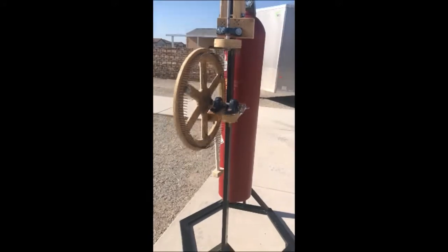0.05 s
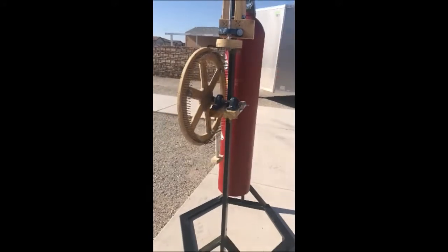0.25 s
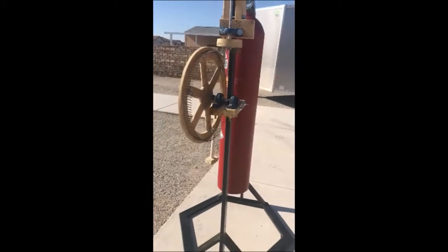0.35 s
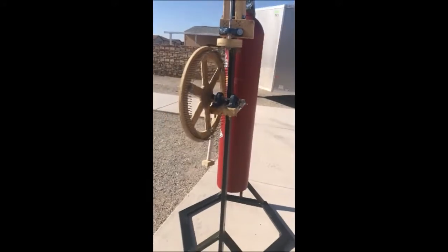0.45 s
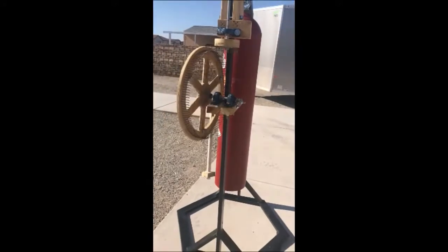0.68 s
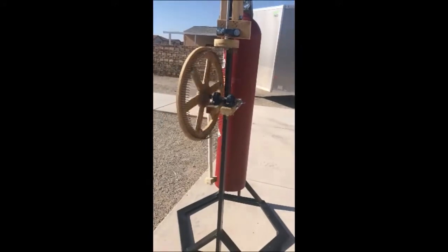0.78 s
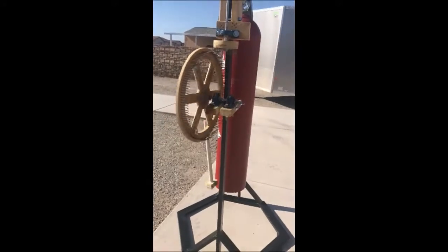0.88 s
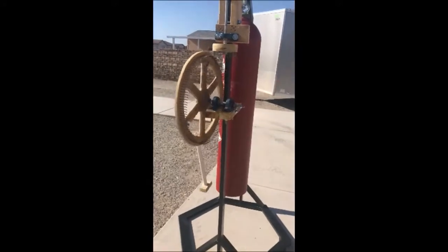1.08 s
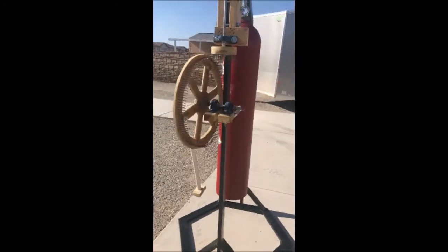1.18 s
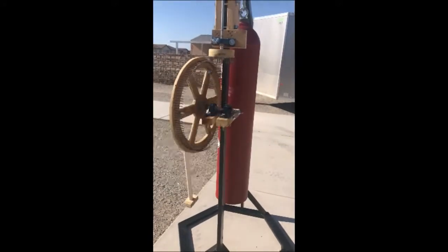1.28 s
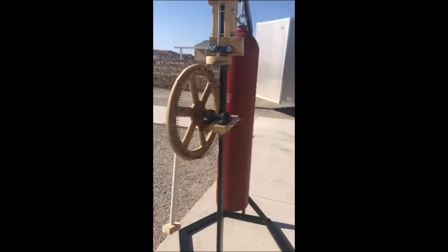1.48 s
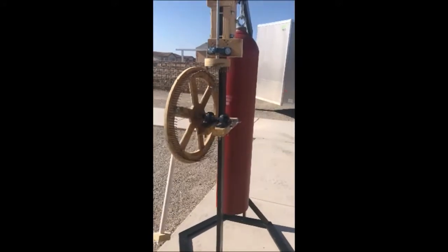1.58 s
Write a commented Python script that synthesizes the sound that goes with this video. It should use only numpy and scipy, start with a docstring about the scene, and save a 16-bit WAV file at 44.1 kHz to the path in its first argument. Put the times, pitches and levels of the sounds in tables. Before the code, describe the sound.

A hanging steel gas cylinder, already humming faintly, is struck once by a mallet with a sharp, rattling clang. It rings on in wavering, bell-like tones while a wooden wheel ticks very faintly, outdoors over a low distant rumble.

```python
"""A mallet strikes a gas cylinder

Outdoors, the mallet of a wooden wheel mechanism hits a hanging steel gas cylinder once and chatters
against its wall. The steel rings in pairs of close tones that beat (swell and dip), over two low hums
left by an earlier blow. The yard echoes; the wheel rubs and ticks; faint air and rumble lie behind."""
import sys
import numpy as np
from scipy import signal
from scipy.fft import rfft, irfft, next_fast_len
from scipy.io import wavfile
from scipy.ndimage import map_coordinates

SR = 44100
rng = np.random.default_rng(int(sys.argv[2]) if len(sys.argv) > 2 else 0)


def generate_wav(signal):
    """Clip the signal to [-1, 1] and save it as 16-bit WAV at the path in sys.argv[1]."""
    frames = np.transpose(np.atleast_2d(signal))
    scaled = np.clip(frames, -1, 1) * 32767
    pcm = np.round(scaled).astype(np.int16)
    wavfile.write(sys.argv[1], SR, pcm)


N = 72765
STRIKE_S = .203

# The cylinder's tone pairs; a ring time is how long a sound takes to fall by 60 dB:
# (pitch [Hz], level [dB], ring time [s], twin's offset [Hz], twin's strength [0-1], time of a dip [s])
TONE_PAIRS = [ (741.4, -25.5, 3.6, -1.25, .6, .58), (855.5, -30.5, 8.3, 1.96, .15, .62),
              (918.9, -22.6, 5, 1.95, .42, .72), (1225.7, -33.3, 1.9, 3.45, .55, .47),
              (1275.5, -37, 3.2, -1.1, .45, .4), (1517.2, -35.4, 1.9, 4, .3, .22),
              (1595, -35.7, 1.7, -6.2, .35, .3), (1624.9, -32.8, 1.5, -8.3, .65, .32),
              (1666.6, -31.1, 1.56, 7.5, .8, .2), (1747.2, -34.6, 1.34, 6.8, .8, .21),
              (1872, -42.5, 1.24, 8.8, .65, .27), (2060.6, -38.9, 1.32, 4.4, .25, .25),
              (2321.9, -50.2, 1.73, 6.4, .35, .31), (2492, -51.5, 3, 5.5, .35, 0.78),
              (2635, -45.5, 0.92, 0.5, 0.6, 1), (2737, -45, 1.4, 1.4, 0, .3),
              (2756.2, -41, .95, 5.5, .25, .37), (2850, -48, 1.3, 5.5, 0.7, 0.4)]
# Its weak upper tones: (pitch [Hz], level [dB], ring time [s])
OVERTONES = [(1050, -53, 3), (1212, -47, 3.5), (2960, -52.5, 0.64), (3122, -53.5, 1.2), (3300, -59, 1.5),
             (3610, -59.5, 1.1), (3620, -64.5, 2.4), (3903, -62.5, 1.1), (4000, -28.5, 0.11),
             (4120, -61.5, 0.87), (4600, -62.5, 0.93), (5310, -68.5, 1.9)]
# Its shimmer of high tones: (pitch [Hz], greatest level of a tone [dB])
SHIMMER_LEVELS = [(2900, -61), (4000, -62), (6500, -64.5), (9000, -76), (14000, -77.5)]
# Its low hums: (pitch [Hz], level [dB], twin's offset [Hz], twin's strength [0-1], time of a dip [s])
HUM_PAIRS = [(319.44, -40, -1.044, 0.72, 0.76), (407.2, -44, .55, 0.2, 1.65)]
# The mallet's hard contacts: (time [s], peak level [dB])
CONTACTS = [(.2029, -26), (.206, -7.5), (.2092, -3.5), (.2168, -13), (.22, -8), (.2333, -20), (.2428, -20)]
# Tone colour of the wooden rattle: (frequency [Hz], relative level [dB])
RATTLE_COLOUR = [(60, -50.5), (200, -23), (500, -11), (800, -6.5), (1000, -7), (1190, 9), (1420, -6),
                 (1750, 1), (2400, -15), (3500, -5), (4200, -4), (6300, -9.5), (8000, -15.5), (10500, -19),
                 (13000, -16.5), (16000, -29.5)]
# How long the rattle lasts: (frequency [Hz], ring time [s])
RATTLE_RING_TIMES = [(300, .16), (1200, 0.11), (2500, .13), (5000, .11), (13000, 0.11)]
# Tone colour of the yard's echoes: (frequency [Hz], relative level [dB])
ECHO_COLOUR = [(80, -50), (300, -24.5), (550, -17.5), (750, 4), (1200, -6.5), (1700, -5), (2200, -16),
               (2800, -14.5), (4000, -27), (8000, -39), (14000, -50)]
# Rubs of the wheel: (start [s], decay time [s], level [dB])
RUBS = [(.95, .05, -65.5), (1.1, .05, -64.5), (1.275, .09, -69)]
# Tone colour of a rub: (frequency [Hz], relative level [dB])
RUB_COLOUR = [(500, -13), (1500, -3), (3800, 1.5), (7000, -9.5), (15000, -17.5)]
# Ticks of the wheel's teeth: (time [s], level [dB])
TICKS = [(0.067, -53), (.565, -52.5), (.61, -52.5), (0.747, -51), (.94, -54), (0.96, -52.5), (0.977, -58),
         (.998, -51), (1.113, -50.5), (1.157, -53), (1.295, -57), (1.34, -51.5), (1.371, -54.5),
         (1.522, -51.5)]
# The tones in one tick: (pitch [Hz], relative level [dB], ring time [s])
TICK_TONES = [(3707, -8, .005), (5940, -5, 0.0033), (11800, -15, .004)]
# Tone colour of the distant rumble: (frequency [Hz], relative level [dB])
RUMBLE_COLOUR = [(20, -27), (45, -2.5), (80, -1.5), (130, -5.5), (175, -0.5), (240, -10.5), (350, -9.5),
                 (480, -21), (650, -13), (1000, -16.5), (1200, -21.5), (1500, -28), (2200, -35.5),
                 (4000, -60)]
# Puffs of breeze on the microphone: (time [s], half-width [s], level [dB])
PUFFS = [(1.17, 0.031, -53), (1.335, 0.021, -45.5), (1.61, 0.027, -43.5)]
# Tone colour of a puff: (frequency [Hz], relative level [dB])
PUFF_COLOUR = [(20, -25), (40, -4), (58, 0.5), (80, -9.5), (160, -29.5), (500, -52.5), (2000, -90.5)]
# Tone colour of the air's hiss: (frequency [Hz], relative level [dB])
AIR_COLOUR = [(1180, -33.5), (2000, -6.5), (2760, -5), (3170, -4), (4990, -10.5), (5630, -11.5),
              (16000, -20)]


def cylinder(rise_s=.00069, pair_waver_db=1.24, overtone_waver_db=2.5):
    """The blow sets the steel ringing in many tones, each fading at its own pace."""
    t = since(STRIKE_S)
    body = 0
    for hz, db, ring_s, beat_hz, twin, dip_s in TONE_PAIRS:
        loudness = amp(db + pair_waver_db * wobble(30)) * fade(t, ring_s)
        body += loudness * beating_pair(t, hz, beat_hz, twin, dip_s - STRIKE_S)
    highs = shimmer(t)
    overtones = sum(ring([tone], t) * amp(overtone_waver_db * wobble(12)) for tone in OVERTONES)
    return (body + overtones + highs) * rise(t, rise_s)


def shimmer(t, count=100, band_hz=(2900, 14000), typical_ring_s=.55):
    """The steel's many high tones blend into a short, bright shimmer."""
    place, size, life, flip = rng.random((count, 4)).T
    pitches = np.interp((np.arange(count) + place) / count, [0, 1], np.sqrt(band_hz)) ** 2
    gains = amp(along(SHIMMER_LEVELS, pitches) + 2.7 * (size - 1)) * np.sign(flip - .5)
    ring_times = typical_ring_s * (.5 + life)
    return sum(gain * fade(t, ring_s) * np.sin(2 * np.pi * hz * t)
               for hz, gain, ring_s in zip(pitches, gains, ring_times))


def hum(before_blow_db=-2):
    """The cylinder's two lowest tones still sound, slowly beating; the blow tops them up."""
    lift = amp(before_blow_db * np.exp(-since(STRIKE_S) / .081))
    return lift * sum(amp(db) * beating_pair(since(0), hz, beat_hz, twin, dip_s)
                      for hz, db, beat_hz, twin, dip_s in HUM_PAIRS)


def rattle(level_db=-15.5, rise_s=.00046, treble_lag_s=.001):
    """The blow shakes the wooden mechanism: a short noise whose lows last longest."""
    hz, times, bands = signal.stft(noise(RATTLE_COLOUR), SR, nperseg=256)
    bands = bands * fade(np.maximum(times - STRIKE_S, 0), along(RATTLE_RING_TIMES, hz)[:, None])
    shaking = signal.istft(bands, SR, nperseg=256)[1][:N]
    lows = filtered(shaking, lambda f: 1 / (1 + (f / 2200) ** 6))
    treble = (shaking - lows) * rise(since(STRIKE_S + treble_lag_s), rise_s)
    return amp(level_db) * (lows * rise(since(STRIKE_S), rise_s) + treble)


def mallet(click_hz=5200, click_s=.00017, burst_gain_db=-16.5, burst_s=.02):
    """The mallet chatters on the steel; each contact gives a click and a burst of rattle."""
    t = since(0)
    clicks = sum(swells([(s, click_s, db)]) * np.cos(2 * np.pi * click_hz * (t - s))
                 for s, db in CONTACTS)
    bursts = sum(amp(db + burst_gain_db) * (t > s) * fade(since(s), burst_s) for s, db in CONTACTS)
    return clicks + bursts * noise(RATTLE_COLOUR)


def yard(level_db=-41.5, ring_s=1.3):
    """The yard returns the blow as a weak wash of scattered echoes."""
    t = since(STRIKE_S)
    return amp(level_db) * noise(ECHO_COLOUR) * fade(t, ring_s) * rise(t, .0069)


def wheel(grain_db=3, squeak_hz=6700):
    """The turning wheel rubs, its teeth tick and its axle gives one tiny squeak."""
    strokes = sum(amp(db) * rise(since(s), .008) * np.exp(-since(s) / decay) for s, decay, db in RUBS)
    rubbing = unit(noise(RUB_COLOUR) * amp(grain_db * wobble(160))) * strokes
    squeak = swells([(1.09, .014, -70.5)]) * np.sin(2 * np.pi * squeak_hz * since(0) + wobble(100))
    ticks = sum(amp(db) * ring(TICK_TONES, since(s)) for s, db in TICKS)
    return rubbing + squeak + ticks


def outdoors(rumble_db=-51, sway_db=1.9, air_db=-74):
    """A far, unsteady rumble, puffs of breeze on the microphone and a thin hiss of air."""
    rumble = amp(rumble_db + sway_db * wobble(23)) * noise(RUMBLE_COLOUR)
    breeze = swells(PUFFS) * noise(PUFF_COLOUR)
    return rumble + breeze + amp(air_db) * noise(AIR_COLOUR)


def beating_pair(t, hz, beat_hz, twin, dip_s):
    """A tone and its slightly mistuned twin drift in and out of step, cancelling most at dip_s."""
    phase = 2 * np.pi * (hz * t + rng.random())
    return np.sin(phase) - twin * np.sin(phase + 2 * np.pi * beat_hz * (t - dip_s))


def ring(tones, t):
    """Fading tones from rows of (pitch [Hz], level [dB], ring time [s])."""
    return sum(amp(db) * fade(t, ring_s) * np.sin(2 * np.pi * hz * t) for hz, db, ring_s in tones)


def swells(rows):
    """Smooth bumps from rows of (time [s], half-width [s], level [dB])."""
    return sum(amp(db) * np.exp(-((since(0) - s) / width) ** 2) for s, width, db in rows)


def since(s):
    """Seconds since time s, zero before it."""
    return np.maximum(np.arange(N) / SR - s, 0)


def rise(t, rise_s):
    """A smooth climb from 0 towards 1."""
    return 1 - np.exp(-t / rise_s)


def fade(t, ring_s):
    """A fall of 60 dB every ring_s seconds."""
    return np.exp(-np.log(1000) * t / ring_s)


def wobble(rate):
    """A smooth curve through rate random points a second."""
    return map_coordinates(rng.standard_normal(256), [np.arange(N) * rate / SR + 2])


def noise(colour):
    """Noise of strength 1 with the given tone colour."""
    return unit(filtered(rng.standard_normal(N), lambda hz: amp(along(colour, hz))))


def filtered(x, response):
    """Turn each frequency in x up or down by response(hz)."""
    size = next_fast_len(N + SR // 2)
    return irfft(rfft(x, size) * response(np.fft.rfftfreq(size, 1 / SR)), size)[:N]


def along(points, hz):
    """Read between rows of (frequency [Hz], value) on a log frequency scale."""
    frequencies, values = np.transpose(points)
    return np.interp(np.log(hz + 1), np.log(frequencies + 1), values)


def amp(db):
    """Turn decibels into a multiplier."""
    return 10 ** (np.asarray(db) / 20)


def unit(x):
    """Scale to an average strength (rms) of 1."""
    return x / np.sqrt(np.mean(x ** 2) + 1e-20)


def scene():
    """All the sounds meet at one microphone."""
    return (cylinder() + hum() + rattle() + mallet() + yard() + wheel() + outdoors())[None]


def record(dry):
    """The very highest treble is cut off steeply."""
    top_hz = 15950
    return filtered(dry[0], lambda hz: 1 / np.sqrt(1 + (hz / top_hz) ** 200))[None]


dry = scene()
out = record(dry)
generate_wav(out)
```